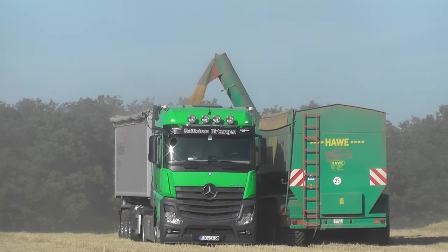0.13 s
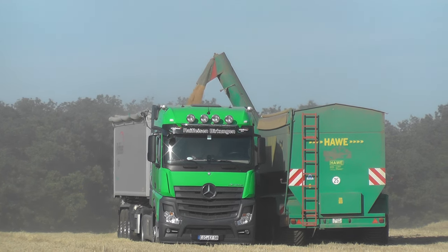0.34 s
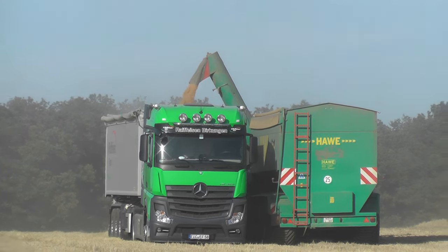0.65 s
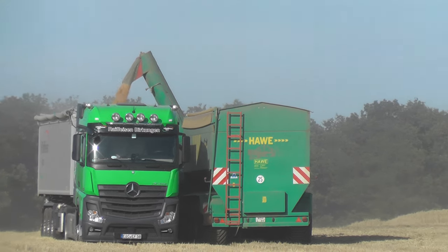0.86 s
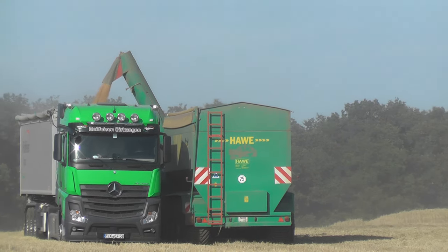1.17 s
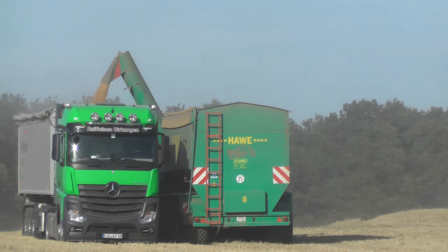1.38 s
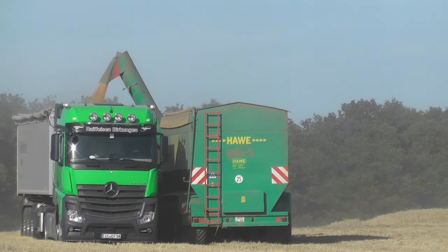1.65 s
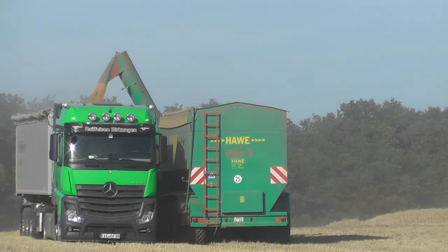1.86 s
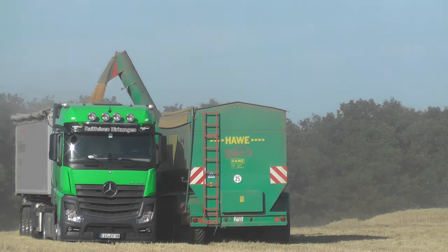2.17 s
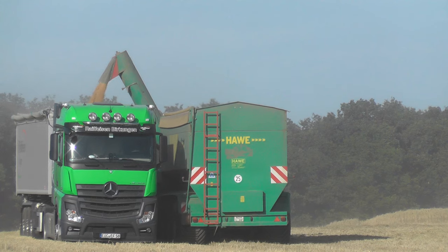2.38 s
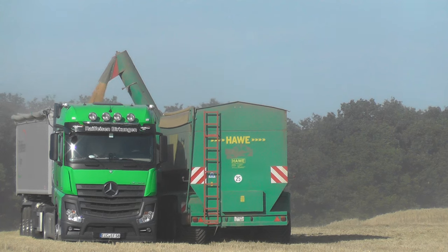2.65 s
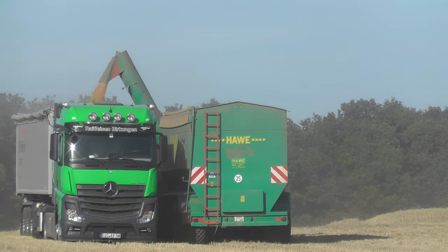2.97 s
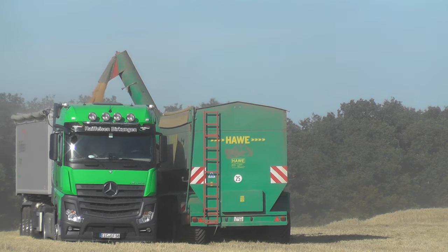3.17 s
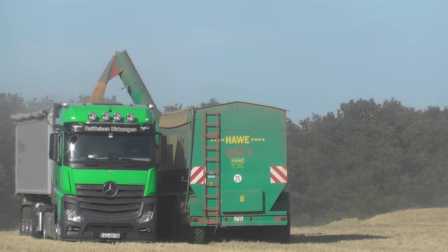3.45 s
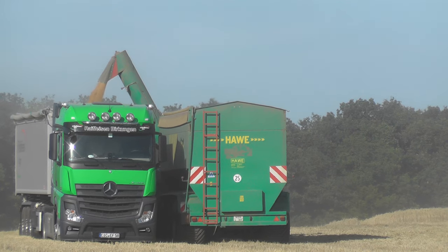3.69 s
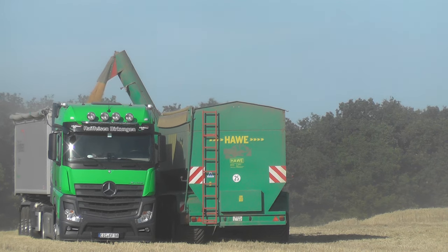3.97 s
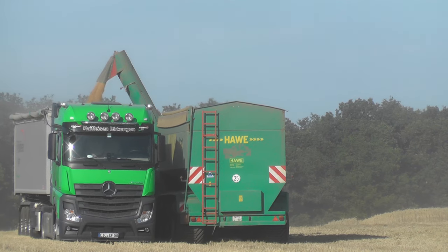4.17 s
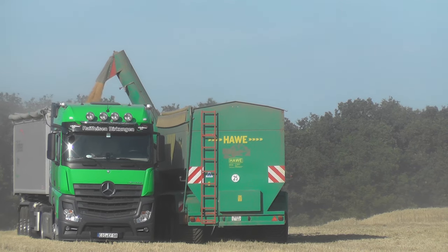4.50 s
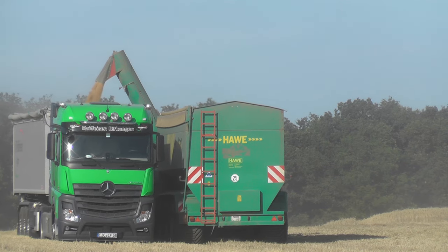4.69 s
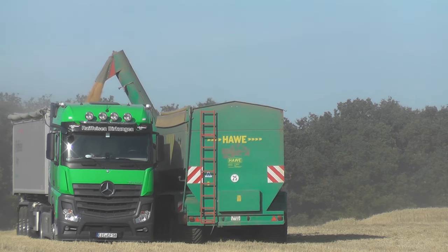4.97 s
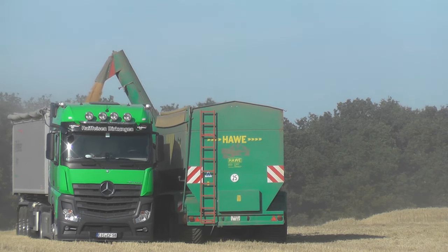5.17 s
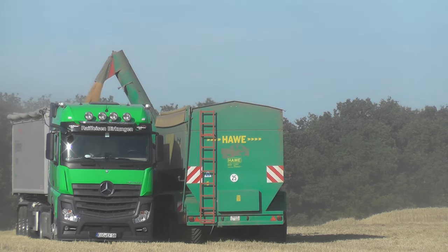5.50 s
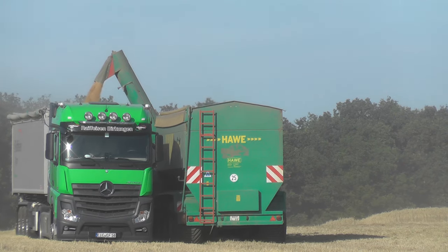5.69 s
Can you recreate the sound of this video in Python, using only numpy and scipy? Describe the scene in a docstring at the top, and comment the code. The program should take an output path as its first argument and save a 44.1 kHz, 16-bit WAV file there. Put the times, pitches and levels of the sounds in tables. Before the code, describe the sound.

Out in a stubble field, farm machinery unloads grain some way off: a low diesel hum, a hollow churning, a hiss of kernels and a thin whine. Close to the microphone, a few steps crackle on dry stalks, the loudest snap coming about halfway through. The sound ducks, then gradually recovers, with a fan-like rush joining the drone and a few faint ticks of straw.

```python
"""A diesel drones across a stubble field as a tractor-driven auger pours grain from a wagon into a truck.
Kernels churn in the steel tube, excite its resonances and hiss as they land; a gear mesh whines.
A drifting reflection interferes with the direct sound and shifts the colour of the machines.
From about 2 s dry straw snaps and crunches beside the microphone. The loudest snap ducks the gain
control, which recovers slowly while a broad rush, perhaps a cooling fan, grows."""
import sys
import numpy as np
from scipy import signal
from scipy.fft import rfft, irfft, next_fast_len
from scipy.io import wavfile
from scipy.ndimage import uniform_filter1d, map_coordinates

SR = 44100
rng = np.random.default_rng(int(sys.argv[2]) if len(sys.argv) > 2 else 0)


def inscribe(sig):
    """Save sig as 16-bit PCM at rate SR to the path in sys.argv[1].

    A 1-D sig is mono; a 2-D sig holds one channel per row.
    Samples are clipped to [-1, 1] before scaling.
    """
    pcm = np.round(np.clip(np.atleast_2d(sig).T, -1, 1) * 32767)
    wavfile.write(sys.argv[1], SR, pcm.astype(np.int16))


N = 257544

# low rumble, raised after the loud snap so the bass ducks less: (time [s], relative level [dB])
RUMBLE_LEVEL = [(0, -26.7), (2.1, -26), (2.6, -28), (3.4, -24.5), (5.8, -24.5)]
# engine and shaft tones: (frequency [Hz], level [dB], pitch wander [Hz])
ENGINE_TONES = [(43.5, -60, .4), (62.3, -49, 0.37), (76.5, -41, .3), (112.3, -33, 0.62),
                (128.7, -38.5, 0.66), (185.1, -43, 0.35), (1027.6, -44.5, 7), (1359, -44, 5.87),
                (1714, -51, 3.95)]
# spectral envelopes of the noise sources: (frequency [Hz], relative level [dB])
EXHAUST_SPECTRUM = [(20, -34), (42, -20.5), (65, -11), (100, 0), (135, 2), (190, -0.5), (250, -13),
                    (340, -20), (450, -14), (800, -36), (3000, -90)]
AUGER_SPECTRUM = [(250, -43), (450, -12.5), (580, -1), (720, 0), (1050, -2.5), (1400, 0), (1750, -6),
                  (2100, -17.5), (3000, -13), (8000, -80)]
GRAIN_SPECTRUM = [(800, -9.5), (2000, -7.5), (2600, -2.5), (3150, 0.5), (3700, -1), (4400, -1), (5400, -6),
                  (6600, -12), (7300, -17.5), (8200, -27.5), (10000, -25), (13000, -30), (15500, -36.5)]
HUSK_SPECTRUM = [(150, -7), (300, -10.5), (460, 3), (650, -1), (1100, -10), (1550, -2), (2400, -22),
                 (4500, -9), (7000, -14), (10000, -51)]
RUSTLE_SPECTRUM = [(1000, -22), (2500, -16), (4500, 3), (6500, 6), (8300, -5), (10000, 1.5), (12300, -3),
                   (14000, -8), (16000, -15)]
RUSH_SPECTRUM = [(200, -31), (380, -9.5), (470, -11), (600, -2), (880, 0.5), (1250, -6.5), (1480, -9.5),
                 (1650, -13), (2000, -20), (2700, -38), (4000, -57)]
# gear mesh tone: (time [s], frequency [Hz], level [dB])
GEAR_MESH = [(0, 1667, -34.5), (1.6, 1685, -34), (2.2, 1677, -39.5), (3.4, 1661, -40), (5.8, 1664, -40.5)]
# reflected path from the machines: (time [s], delay [ms], relative strength [0-1])
REFLECTION_PATH = [(0, .93, 0.51), (1.6, .92, 0.43), (2.1, 0.84, 0.33), (2.37, 1.1, 0.55),
                   (2.75, 1.325, 0.2), (3.05, 1.2, 0.38), (4.0, 1.207, 0.47), (5.3, 1.34, 0.18),
                   (5.84, 1.3, 0.14)]
# response of that path: (frequency [Hz], gain [0-1])
REFLECTION_RESPONSE = [(150, 0.17), (600, 0.68), (1300, 0.8), (3200, 0.86), (7000, 0.41)]
# modes of the auger tube: (frequency [Hz], width [Hz], resting level [dB])
TUBE_RESONANCES = [(700, 93, -39), (1049, 66, -53), (2895, 91, -57)]
# grain drives one mode harder: (peak time [s], duration [s], frequency [Hz], level [dB])
TUBE_SWELLS = [(.6, 2.6, 1050, -37), (2.302, 0.42, 1050, -29.5), (2.676, 0.64, 700, -30),
               (3.08, 0.35, 1050, -33), (3.354, .3, 700, -29), (5.097, 1.1, 2900, -36.5)]
# hollow comb colouring of the microphone or camera: (frequency [Hz], delay [ms])
MIC_COMB_DELAY = [(470, 2.13), (865, 2.31), (1240, 2.42), (1610, 2.48), (2010, 2.49), (2355, 2.548),
                  (3500, 2.57), (5060, 2.565), (7000, 2.54), (9100, 2.51), (10100, 2.48), (15000, 2.475)]
# strength of that comb's delayed copy: (frequency [Hz], gain [0-1])
MIC_COMB_GAIN = [(200, 0.04), (460, 0.73), (850, 0.89), (1240, 0.37), (2000, 0.63), (2800, 0.52),
                 (4000, 0.32), (6500, 0.36), (8500, 0.4), (11500, 0.74), (15000, 0.9)]
# diffuse share of the field: (frequency [Hz], side relative to mid [dB])
DIFFUSE_SHARE = [(30, -11), (70, -13), (125, -31), (280, -18), (600, -17), (1100, -20), (2200, -16.5),
                 (3200, -26), (4500, -62)]
# channel balance: (frequency [Hz], left minus right [dB])
BALANCE = [(60, -2), (125, -0.4), (250, -0.2), (600, -0.6), (1200, -2), (2200, -1), (4000, 0)]
# breaking stalks: (time [s], crack energy [dB], centre frequency [Hz], bandwidth [octaves])
STALK_BREAKS = [(2.113, -9, 7800, 1.6), (2.176, -22, 11000, 1), (2.883, -2.5, 4570, 0.65),
                (2.927, -4.5, 6030, 0.36), (2.961, -12, 11000, .4), (3.026, -2, 6800, 1.4),
                (3.1126, 1, 4400, 0.65), (3.139, 12, 3620, 1.2), (3.1392, 10.5, 8800, 0.86),
                (3.1657, 4.5, 4600, 1.7), (3.3026, 1.5, 4770, .44), (3.326, -12.5, 10000, .4),
                (3.406, -10, 11900, 0.88), (3.582, -11.5, 8400, 0.96), (4.0215, -11.5, 8850, 1),
                (4.356, -20, 11100, .7), (4.883, -22, 11100, .6), (5.1715, -12.5, 9500, .8)]
# weight set down on the stubble: (start time [s], hold [s], relative level [dB])
STUBBLE_TREADS = [(2.31, .11, -53), (2.602, 0.14, -42), (2.75, .05, -38), (2.874, 0.21, -43.5),
                  (3.164, 0.068, -39), (3.3, 0.13, -45.5), (3.697, .06, -47), (3.945, 0.057, -50)]


def amp(db):
    """Decibels to amplitude ratio."""
    return 10 ** (np.asarray(db) / 20)


def unit(x):
    """Scale to rms 1."""
    return x / np.sqrt(np.mean(x ** 2) + 1e-20)


def along(points, hz):
    """Interpolate (frequency, value) points on a logarithmic frequency axis."""
    f, v = np.transpose(points)
    return np.interp(np.log(hz + 1), np.log(f + 1), v)


def curves(rows):
    """Interpolate each column after the time to one value per sample."""
    times, *columns = np.transpose(rows)
    return [np.interp(np.arange(N) / SR, times, column) for column in columns]


def wobble(rate):
    """Random modulation: a smooth curve through rate knots a second."""
    return map_coordinates(rng.standard_normal(int(N * rate / SR) + 4), [np.arange(N) * rate / SR])


def filtered(x, response):
    """Linear filtering: the spectrum of x times a frequency response."""
    size = next_fast_len(N + 8192)
    return irfft(rfft(x, size) * response(np.fft.rfftfreq(size, 1 / SR)), size)[..., :N]


def coloured(x, spectrum):
    """Spectral shaping: x under a spectral envelope, at rms 1."""
    return unit(filtered(x, lambda hz: amp(along(spectrum, hz))))


def impacts(rate, spread_db):
    """Shot noise: tiny random blows of unequal size, rate a second."""
    hits = rng.random(N) < rate / SR
    return unit(hits * rng.standard_normal(N) * amp(spread_db * rng.uniform(-0.69, 1, N)))


def tone(hz):
    """A sine of rms 1 whose phase is the integral of its frequency."""
    return np.sqrt(2) * np.sin(2 * np.pi * (np.cumsum(hz) / SR + rng.random()))


def diesel():
    """Periodic motion of engine and shafts radiates wandering tones over the exhaust's noise."""
    rumble_db, = curves(RUMBLE_LEVEL)
    rumble = coloured(rng.standard_normal(N), EXHAUST_SPECTRUM) * amp(rumble_db - 2.5 + 0.83 * wobble(14))
    hums = sum(amp(db + 1.04 * wobble(4.96)) * tone(hz + wander * wobble(16))
               for hz, db, wander in ENGINE_TONES)
    return rumble + hums


def auger(level_db=-30):
    """Impact excitation: the screw churns kernels against its steel tube, which colours the blows."""
    churn = impacts(rate=7000, spread_db=4) * amp(0.63 * wobble(35))
    return amp(level_db + 0.53 * wobble(2.83)) * coloured(churn, AUGER_SPECTRUM)


def grain(level_db=-32, flutter_hz=44.0, flutter_depth=0.031):
    """Superposed impacts of falling kernels form a hiss, amplitude-modulated by the drive."""
    flow = 1 + flutter_depth * tone(flutter_hz + wobble(3.8))
    shower = impacts(rate=12000, spread_db=1) * flow * amp(0.45 * wobble(12))
    return amp(level_db) * coloured(shower, GRAIN_SPECTRUM)


def gear():
    """Meshing teeth radiate a thin whine whose frequency follows the shaft speed."""
    hz, db = curves(GEAR_MESH)
    return amp(db + 1.44 * wobble(14)) * tone(hz + 2.3 * wobble(30))


def drifting_reflection(x):
    """Comb filtering: a slightly longer path interferes with the direct one as its delay drifts."""
    delay_ms, strength = curves(REFLECTION_PATH)
    reflected = filtered(x, lambda hz: along(REFLECTION_RESPONSE, hz))
    return x + strength * map_coordinates(reflected, [np.arange(N) - delay_ms * SR / 1000])


def tube_ring():
    """Forced resonance: tumbling grain keeps three modes of the tube ringing, each swelling at times."""
    out, t = np.zeros(N), np.arange(N) / SR
    for hz, width_hz, rest_db in TUBE_RESONANCES:
        swell_power = sum(amp(db) ** 2 * np.exp(-(2 * (t - peak) / duration) ** 2)
                          for peak, duration, swell_hz, db in TUBE_SWELLS if abs(swell_hz / hz - 1) < .2)
        ring = filtered(rng.standard_normal(N), lambda f: 1 / (1 + ((f - hz) / width_hz) ** 2) ** 2)
        out += np.sqrt(amp(rest_db) ** 2 + swell_power) * unit(ring)
    return out


def mic_notches(hz):
    """Comb filtering in the microphone or camera: an inverted, delayed copy cuts stationary notches."""
    return 1 - along(MIC_COMB_GAIN, hz) * np.exp(-2j * np.pi * hz * along(MIC_COMB_DELAY, hz) / 1000)


def stereo(x):
    """Weak diffuse sound decorrelates the channels; the nearly mono image leans to the right."""
    scatter = rng.standard_normal(SR // 10)
    diffuse = signal.fftconvolve(x, scatter / np.linalg.norm(scatter))[:N]
    side = filtered(diffuse, lambda hz: amp(along(DIFFUSE_SHARE, hz)))
    channels = np.array([x + side, x - side])
    return filtered(channels, lambda hz: amp(np.outer([.5, -.5], along(BALANCE, hz))))


def snaps(crack_t60=0.0018, splinter_db=-23, splinter_t60=0.031,
          thud_hz=720, thud_db=-18, thud_t60=0.0099):
    """Brittle fracture: each stalk gives a band-limited burst, a tail of splinters and a dull thud."""
    out, t = np.zeros(N + SR), np.arange(SR // 20) / SR
    thud = amp(thud_db - 60 * t / thud_t60) * np.sin(2 * np.pi * thud_hz * t)
    decay = amp(-60 * t / crack_t60) + amp(splinter_db - 60 * t / splinter_t60)
    for start, db, hz, octaves in STALK_BREAKS:
        band_hz = np.minimum(hz * 2 ** (octaves * np.array([-.5, .5])), SR / 2 - 1)
        burst = decay * rng.standard_normal(len(t))
        crack = signal.lfilter(*signal.butter(2, band_hz, "bandpass", fs=SR), burst)
        out[round(start * SR):][:len(t)] += amp(db) * (crack / np.linalg.norm(crack) + thud)
    return out[:N]


def tread_load(attack_s=0.035, release_s=0.074):
    """Loading and relaxation: straw gives way under each tread, holds, then settles exponentially."""
    t = np.arange(N) / SR
    treads = [amp(db) * np.exp(np.minimum(t - start, 0) / attack_s
                               - np.maximum(t - start - hold, 0) / release_s)
              for start, hold, db in STUBBLE_TREADS]
    return np.max(treads, axis=0)


def fibres(rate, centre_hz, decay_cycles, spread_db):
    """Damped oscillation: each cracking fibre rings for a few cycles at its own frequency."""
    count, t = int(rate * N / SR), np.arange(160) / SR
    when, pitch, size = rng.random((count, 3)).T[:, :, None]
    hz = centre_hz * 2 ** (1.6 * (pitch - .5))
    cracks = amp(spread_db * size ** 3) * np.sin(2 * np.pi * hz * t) * np.exp(-hz * t / decay_cycles)
    samples = (when * N).astype(int) + np.arange(len(t))
    return unit(np.bincount(samples.ravel(), cracks.ravel(), N)[:N])


def straw(husk_db=-29, husk_exponent=1.3):
    """Crackling noise: rustle and fibre cracks scale with the load; the dull husk crunch grows faster."""
    load = tread_load()
    husks = coloured(impacts(rate=3000, spread_db=4.5), HUSK_SPECTRUM) * amp(husk_db + 1.4 * wobble(60))
    rustle = coloured(impacts(rate=9000, spread_db=4), RUSTLE_SPECTRUM) * amp(3 + 1.2 * wobble(90))
    cracks = amp(2) * fibres(rate=420, centre_hz=7660, decay_cycles=2.1, spread_db=12)
    return (load / load.max()) ** husk_exponent * husks + load * (rustle + cracks)


def rush(start_s=3.22, rise_s=0.56, full_db=-31.5):
    """Broadband noise, perhaps a cooling fan, approaches its full level and fills in the hollow colour."""
    rise = 1 - np.exp(-np.maximum(np.arange(N) / SR - start_s, 0) / rise_s)
    return rise * amp(full_db + 0.42 * wobble(13)) * coloured(rng.standard_normal(N), RUSH_SPECTRUM)


def scene():
    """Superposition of far machines and near straw at the microphone."""
    machines = drifting_reflection(diesel() + auger() + grain() + gear())
    stalks = snaps()
    notched = filtered(machines + straw() + stalks, mic_notches)
    field = stereo(notched + tube_ring() + rush())
    snap_side = amp(-24) * np.gradient(stalks)  # near cracks reach the two ports slightly differently
    return field + np.outer([1, -1], snap_side)


def record(dry, threshold_db=-8.5, recovery_db_per_s=2.5, clip_level=.85, cutoff_hz=15830):
    """Automatic gain control: a loud millisecond cuts the gain at once, then it creeps back."""
    power = np.abs(uniform_filter1d(np.mean(dry ** 2, axis=0), size=SR // 1000))
    over_db = np.maximum(10 * np.log10(power + 1e-12) - threshold_db, 0)
    creep_db = recovery_db_per_s * np.arange(N) / SR
    cut_db = np.maximum.accumulate(over_db + creep_db) - creep_db
    clipped = np.clip(dry * amp(-cut_db), -clip_level, clip_level)
    return filtered(clipped, lambda hz: hz < cutoff_hz)


dry = scene()
out = record(dry)
inscribe(out)
```